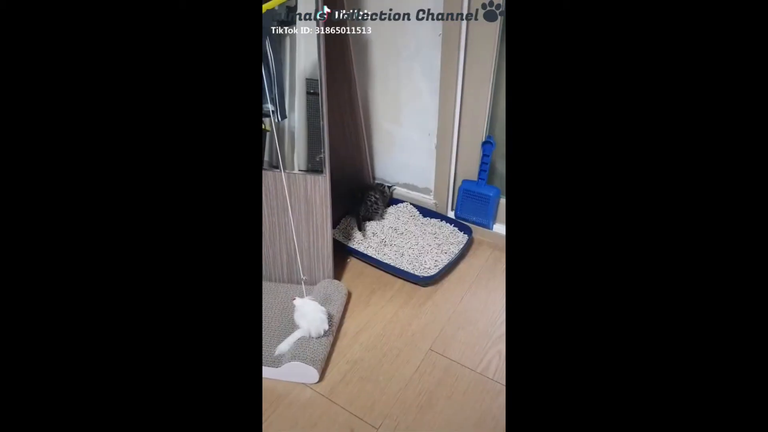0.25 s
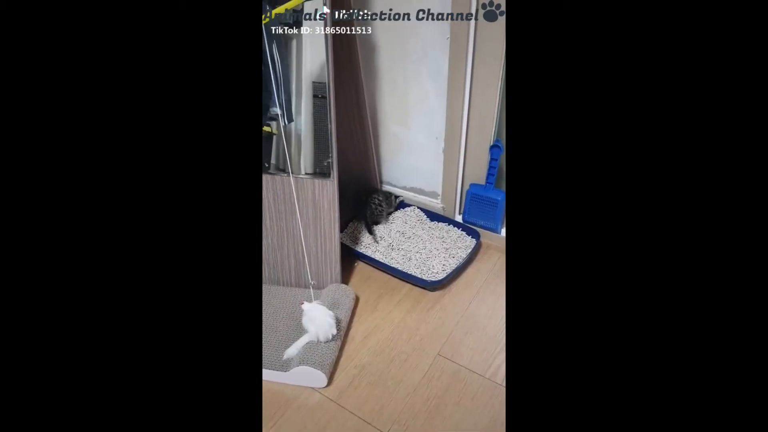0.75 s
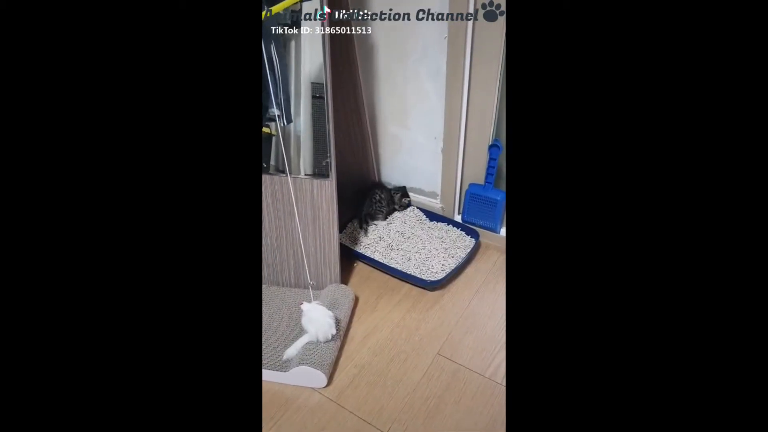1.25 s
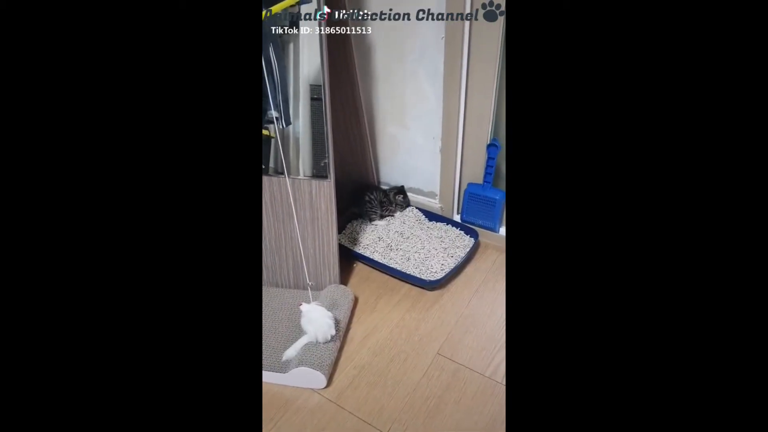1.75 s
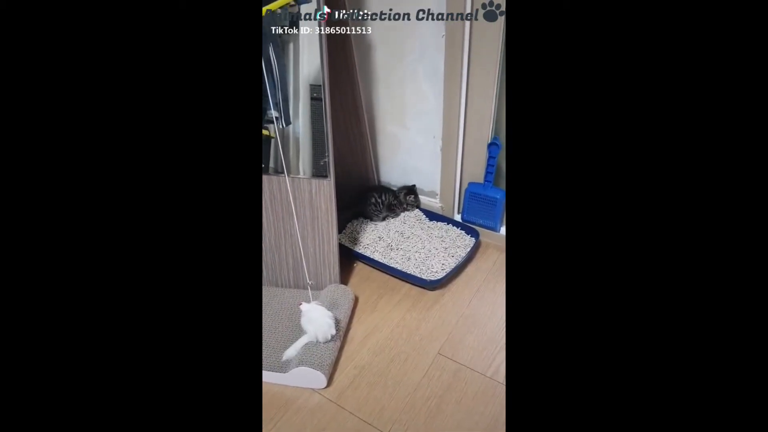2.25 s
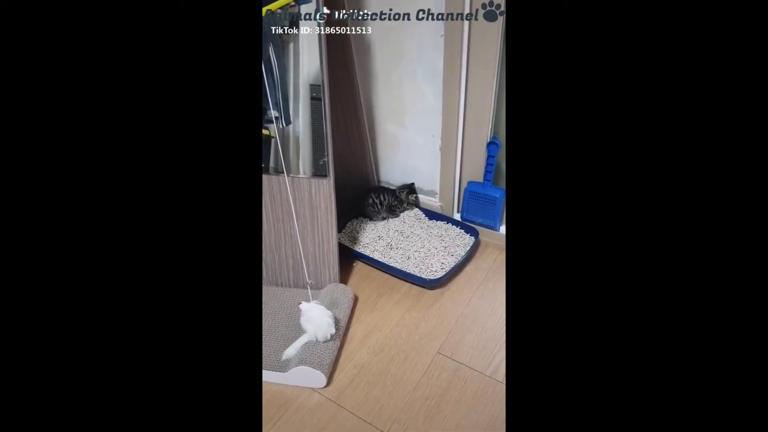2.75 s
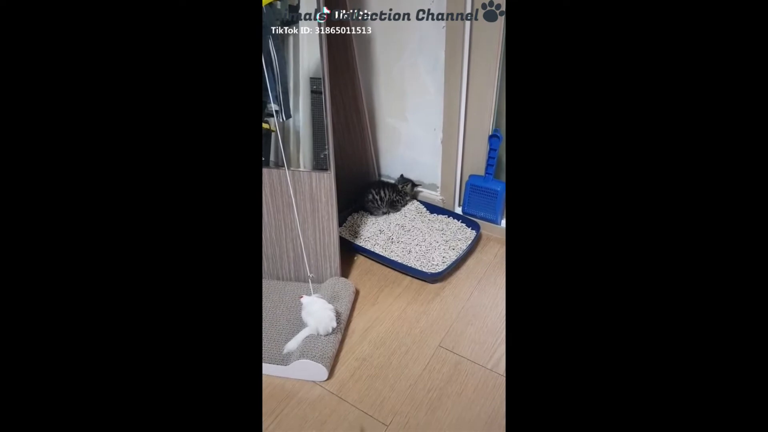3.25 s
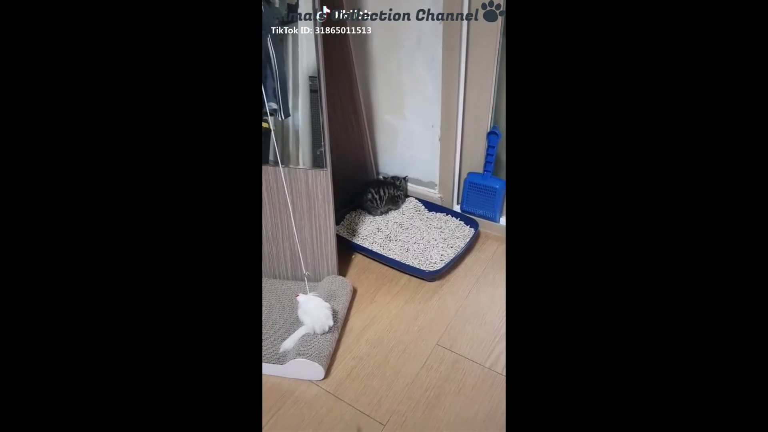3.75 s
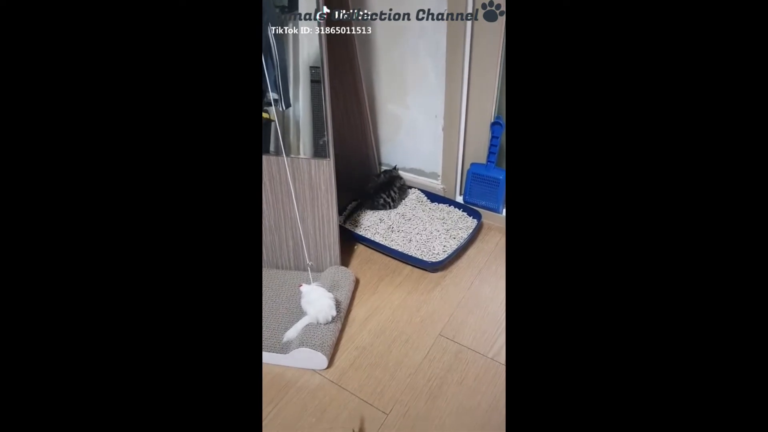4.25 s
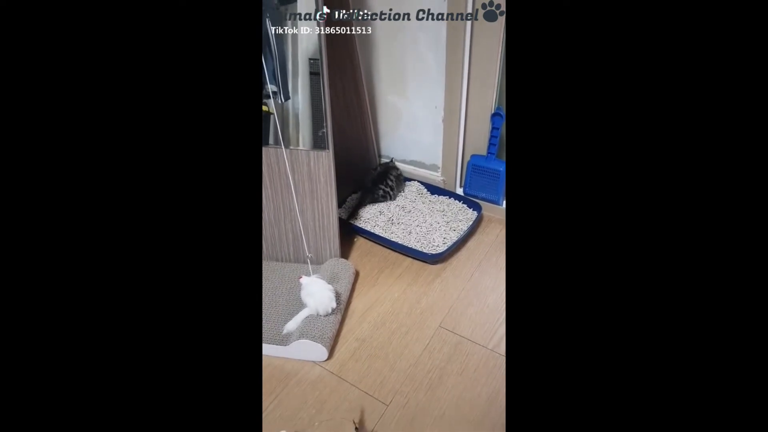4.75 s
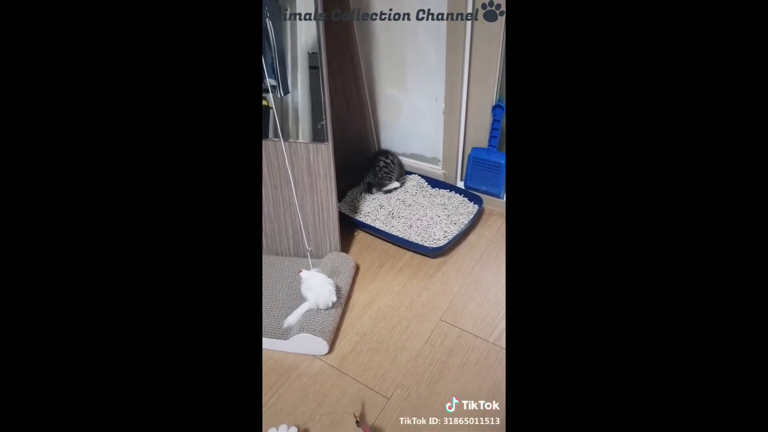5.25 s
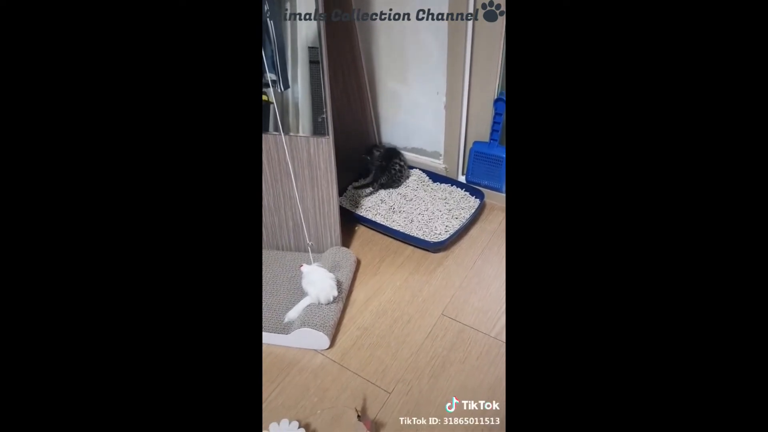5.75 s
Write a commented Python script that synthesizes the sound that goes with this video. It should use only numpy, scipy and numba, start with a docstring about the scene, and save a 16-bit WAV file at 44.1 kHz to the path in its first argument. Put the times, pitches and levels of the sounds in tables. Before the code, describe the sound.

Crunching, rattling strokes of small hard pellets, with claws tapping hollow plastic and flung pellets snapping and bouncing. Strokes come in clusters with calmer shuffling between them, and grow nearly continuous in the last two seconds. The sound is close, dry and slightly left in stereo, with a short room tail. A soft engine rumble from outside wavers underneath and drops in pitch near the end.

```python
"""Crunching, rattling paw strokes and bright snaps: a kitten paws through pellet litter in a plastic tray.
The tray stands in the corner of a small room, left of a phone with two microphone ports.
Each stroke swells a dense stream of damped sine knocks; flung pellets and claws add single hits and bounces.
Behind it an engine drones outdoors as two sines and slows down, over room noise, faint hum and a rustle."""
import sys
import numpy as np
from scipy import signal
from scipy.fft import rfft, irfft, next_fast_len
from scipy.io import wavfile
from scipy.ndimage import uniform_filter1d
from numba import njit

SR = 44100
rng = np.random.default_rng(int(sys.argv[2]) if len(sys.argv) > 2 else 0)


def wav_record(signal):
    """Record a signal, one row per channel, as 16-bit PCM in the file named by sys.argv[1]."""
    frames = np.transpose(np.atleast_2d(signal))
    bounded = np.clip(frames, -1, 1)
    # unit amplitude maps onto the largest positive 16-bit level
    quanta = np.round(bounded * 32767).astype(np.int16)
    wavfile.write(sys.argv[1], SR, quanta)


N = 265041


def undb(db):
    """Turns decibels into an amplitude factor."""
    return 10 ** (np.asarray(db) / 20)


def level(x, db):
    """Scales a signal to an rms level in dB."""
    return x * undb(db) / np.sqrt(np.mean(x ** 2))


def at_hz(table, hz):
    """Reads a spectrum on a log-frequency axis."""
    f, v = np.transpose(table)
    return np.interp(np.log(hz), np.log(f), v)


def walk(rate_hz):
    """Wanders smoothly at random: values held 1 / rate_hz s, averaged twice, with a spread near 1."""
    hold = int(SR / rate_hz)
    steps = np.repeat(rng.standard_normal(N // hold + 1), hold)
    return 1.38 * uniform_filter1d(uniform_filter1d(steps, hold), hold)[:N]


# Spectrum of the room noise, before it is set to its overall level: pitch_hz, relative level_db (per Hz)
AIR_SPECTRUM = [(15, 0), (25, -16.5), (58, -5.5), (118, -10), (135, -17), (185, -19), (205, -24.5),
                (274, -24.5), (386, -30), (418, -27.5), (766, -36.5), (1870, -37.5), (2710, -47),
                (12500, -42), (13500, -61)]
# How alike the room noise is at the two ports: pitch_hz, correlation (0 to 1)
PORT_LIKENESS = [(60, 0.9), (130, 0.78), (280, 0.69), (600, 0.00067), (1300, 0.0)]


def air(level_db=-54, swell_db=.4, flicker_db=2.5, left_db=1.35):
    """Half-octave bands of room noise swell together and flicker alone; the bass is alike at both ports."""
    n = 2 * next_fast_len(N // 2 + 1)
    hz = np.fft.rfftfreq(n, 1 / SR)[1:]
    like = np.clip(at_hz(PORT_LIKENESS, hz), 0, 1)
    colour = undb(at_hz(AIR_SPECTRUM, hz))
    # what the ports share, and what they hear with opposite sign
    mid, side = (rfft(rng.standard_normal(n))[1:] * colour * np.sqrt(1 + sign * like) for sign in (1, -1))
    ports = np.array([mid + side, mid - side])
    out, swell = 0, swell_db * walk(1.0)
    for step in range(19):
        share = np.clip(1 - abs(2 * np.log2(hz / 25) - step), 0, 1)
        spectrum = np.pad(ports * share, ((0, 0), (1, 0)))  # no constant offset
        band = irfft(spectrum, n)[:, :N]
        out = out + band * undb(swell + flicker_db * walk(22))
    return level(out, level_db) * undb([[left_db / 2], [-left_db / 2]])


# Steady appliance tones in the room: pitch_hz, level_db (rms)
HUM_TONES = [(299, -79.5), (420, -85)]


def hum():
    """Appliances hold steady sines, equal at both ports."""
    t = np.arange(N) / SR
    return sum(np.sqrt(2) * undb(db) * np.sin(2 * np.pi * hz * t) for hz, db in HUM_TONES)


# How strongly the engine reaches the room: time_s, level_db (lower tone, rms), second_multiple_db (rms);
# both waver and lean left
ENGINE_LEVELS = [(0.0, -68, -63), (0.8, -53.5, -60), (1.5, -59, -70), (2.25, -58, -56), (2.9, -58, -79),
                 (3.35, -56.5, -58.5), (3.55, -58, -76), (3.849, -66, -53.5), (3.999, -47.5, -56),
                 (4.45, -49.5, -58.5), (5.03, -47, -63.5), (5.13, -56, -58.5), (5.29, -47, -55),
                 (5.55, -58.5, -75), (5.75, -64, -63), (5.85, -65, -50), (6.01, -48, -56)]
# the lower tone runs steadily, then glides down to a tick-over
RUNNING_HZ, SLOWS_AT_S, TICKOVER_HZ, SLOWING_S = 54.7, 5.08, 36.9, 0.26


def engine(waver_hz=0.73, waver_db=0.5, left_db=3.0, second_left_db=2.0):
    """Two multiples of the firing rate come through the walls, slightly unsteady."""
    t = np.arange(N) / SR
    at, *columns = np.transpose(ENGINE_LEVELS)
    low_db, second_db = (np.interp(t, at, c) for c in columns)
    slowing = np.exp(-np.maximum(t - SLOWS_AT_S, 0) / SLOWING_S)
    hz = TICKOVER_HZ + (RUNNING_HZ - TICKOVER_HZ) * slowing
    phase = 2 * np.pi * np.cumsum(hz + waver_hz * walk(12)) / SR
    ports = np.array([[.5], [-.5]])
    low = undb(low_db + waver_db * walk(22) + left_db * ports) * np.sin(phase)
    second = undb(second_db + waver_db * walk(8.2) + second_left_db * ports) * np.sin(2 * phase)
    return np.sqrt(2) * (low + second)


# A faint middle-range rustle, strongest about four seconds in: time_s, level_db (rms before its flicker)
RUSTLE_LEVELS = [(0, -80), (3.4, -74.5), (3.72, -67), (3.85, -62), (3.97, -59), (4.4, -68), (5.3, -69),
                 (5.6, -76), (6.01, -70)]


def rustle(hz=1350, width_hz=450, flicker_db=3.5):
    """Noise through one broad resonance applied twice, unsteady and unlike at the two ports."""
    peak = signal.iirpeak(hz, hz / width_hz, fs=SR)
    noise = rng.standard_normal((2, N))
    band = signal.lfilter(*peak, signal.lfilter(*peak, noise))
    swell_db = np.interp(np.arange(N) / SR, *np.transpose(RUSTLE_LEVELS))
    return level(band, 0) * undb(swell_db + flicker_db * walk(29.9))


@njit
def ring(n, start, turn, fade, size, rise):
    """Adds one damped sine for each knock; the contact takes a moment to build up."""
    out = np.zeros(n)
    for k in range(len(start)):
        z, per_sample = size[k] + 0j, np.exp(1j * turn[k] - fade[k])
        soft, soft_step = 1., np.exp(-turn[k] / rise)
        for i in range(start[k], min(n, start[k] + int(6 / fade[k]))):
            out[i] += z.imag * (1 - soft)
            z, soft = z * per_sample, soft * soft_step
    return out


# How much louder the port facing the tray hears a knock: pitch_hz, left_minus_right_db (before random panning)
LEFT_EXCESS = [(300, 2), (600, 4.5), (1200, 4), (2400, 4), (4500, 9.5), (7200, 11), (13000, -3)]
SPOTS = 5  # places in the tray, each with its own echoes
LEFT_LEAD_S = 0.00014  # average head start of the left port
CONTACT_RAD = 3.1  # build-up of a knock, in radians of its own pitch


def knocks(s, hz, cycles, size, lead_spread_s=.0001, pan_db=2.0):
    """Knocks from random tray spots; the left port faces them, mostly hears first and gets more treble."""
    hz = np.clip(hz, 100, .4 * SR)
    turn, fade = 2 * np.pi * hz / SR, hz / SR / cycles
    spot = rng.random(len(s))
    early, aside = rng.standard_normal((2, len(s)))
    side = undb((at_hz(LEFT_EXCESS, hz) + pan_db * aside) / 2)
    left = (s * SR).astype(int)
    lead = ((LEFT_LEAD_S + lead_spread_s * early) * SR).astype(int)
    right = np.maximum(left + lead, 0)
    ports = ((left, size * side), (right, size / side))
    out = []
    for k in range(SPOTS):
        m = (spot * SPOTS).astype(int) == k
        out.append([ring(N, at[m], turn[m], fade[m], gain[m], CONTACT_RAD) for at, gain in ports])
    return np.array(out)


def room(dry, wet_db, t60_s=0.083):
    """The corner and the walls return a short diffuse tail, different for each spot and port."""
    t = np.arange(int(.3 * SR)) / SR
    tail = rng.standard_normal((SPOTS, 2, len(t))) * undb(-60 * t / t60_s) * (t > .002)
    tail = tail / np.sqrt(np.sum(tail ** 2, axis=2, keepdims=True))
    wet = signal.fftconvolve(dry, tail, axes=2)[:, :, :N]
    return np.sum(dry + undb(wet_db) * wet, axis=0)


# Resonances of the plastic tray: pitch_hz, width_hz, level_db (against the sound that drives them)
TRAY_MODES = [(817, 87, -17.5), (997, 40, -2), (1340, 40, -8), (2060, 50, -15.5), (2500, 83, -15.5),
              (3920, 270, -15), (5500, 83, -10.5), (6700, 140, -6)]


def tray_ring(x):
    """The tray rings on at its own pitches under the litter that moves in it."""
    out = x
    for hz, width_hz, db in TRAY_MODES:
        out = out + undb(db) * signal.lfilter(*signal.iirpeak(hz, hz / width_hz, fs=SR), x)
    return out


# Paws landing on the tray: start_s, level_db (nominal size of the knock)
PAW_LANDINGS = [(2.174, -43.5), (3.986, -41)]


def thumps(hz=270, cycles=0.98):
    """Dull blows that flex the tray floor."""
    s, db = np.transpose(PAW_LANDINGS)
    return knocks(s, hz * np.ones(len(s)), cycles, undb(db))


# Claws and clumps knocking the tray floor: start_s, level_db (nominal size of the knock), pitch_hz
CLAW_KNOCKS = [(0.056, -32, 1510), (0.067, -30, 1450), (0.146, -34.5, 740), (0.187, -40, 1330),
               (0.673, -35.5, 1340), (0.692, -43, 1120), (0.728, -39, 900), (0.737, -38, 870),
               (1.153, -43, 830), (1.393, -43, 1020), (1.42, -52, 990), (1.51, -37, 1600),
               (2.404, -39.5, 883), (2.458, -38, 950), (2.58, -45, 775), (2.602, -30.5, 860),
               (2.629, -29.5, 990), (3.475, -49, 956), (3.987, -33, 800), (4.125, -31, 1340),
               (4.157, -32, 1360), (4.519, -42, 781), (4.533, -41, 770), (4.858, -44, 1440),
               (4.87, -38, 1440), (5.06, -33, 1310), (5.105, -39, 1340), (5.432, -47, 675),
               (5.617, -44, 1090), (5.704, -36.5, 980), (5.811, -44, 790), (5.849, -36, 848),
               (5.898, -38, 710)]


def claws(cycles=1.92):
    """Short hollow knocks on the plastic."""
    s, db, hz = np.transpose(CLAW_KNOCKS)
    return knocks(s, hz, cycles, undb(db), lead_spread_s=0, pan_db=0)


# Pellets flung at the tray: start_s, level_db (nominal size of the hit), pitch_hz,
# bounce_db (bounces against the hit, before fading and a random 0 to 4 dB lift)
FLUNG_PELLETS = [(0.0570, -34, 1740, -15), (0.0688, -27.5, 3680, -12), (0.0728, -31, 3930, -16),
                 (0.0783, -33, 3700, -16), (0.0883, -38, 3950, -18), (0.0940, -31, 4200, -20),
                 (0.1062, -29.5, 3580, -18), (0.1975, -32, 3960, -10), (0.1475, -37, 1990, -10.5),
                 (0.2404, -37, 3500, -18), (0.2772, -40, 4300, -14), (0.2893, -40, 5400, -14),
                 (0.4549, -46, 3770, -12), (0.4668, -26.5, 4700, -13), (0.4712, -32, 5500, -9),
                 (0.6740, -31.5, 5900, -18), (0.6872, -32.5, 5520, -12), (0.8939, -51.5, 4840, -4),
                 (1.1440, -41, 4600, -12), (1.1545, -49, 1440, -11), (1.2425, -56, 2640, -10),
                 (1.3557, -52, 1700, 2), (1.4583, -45, 3920, -18), (1.494, -40, 5600, -3),
                 (1.5097, -33.5, 4350, -7), (1.5169, -34, 2580, -8), (1.5225, -34, 3000, -8),
                 (1.529, -35, 4500, -8), (2.0992, -54, 2840, -7), (2.4055, -31, 4400, -9),
                 (2.4372, -31.5, 5400, -10), (2.4590, -29.5, 4980, -6), (2.6030, -29, 2600, -13),
                 (2.6222, -30, 4300, -8), (2.6363, -24.5, 3450, -18), (2.6438, -30, 3300, -15),
                 (2.6495, -39, 2960, -4), (2.6933, -36.5, 5040, -10), (2.7184, -48, 4210, -11),
                 (2.7243, -43, 4740, -20), (2.7544, -48, 3640, -20), (2.7830, -47, 4700, -7),
                 (2.8212, -54, 3800, -11), (2.8680, -47, 4650, -8), (2.8755, -50, 4500, -16),
                 (3.5082, -50, 1570, -12), (3.9795, -28, 7350, -9), (3.988, -31.5, 4800, -8),
                 (4.0384, -32.5, 3560, -14), (4.0412, -33, 3800, -16), (4.1256, -33, 2200, -14),
                 (4.1563, -30, 3930, -12), (4.1592, -29, 4200, -14), (4.1625, -31, 3000, -12),
                 (4.167, -33, 4000, -12), (4.2153, -41.5, 2410, -10), (4.5136, -43, 2460, -10),
                 (4.5327, -34.5, 3480, -16), (4.8558, -41, 2240, -5), (4.8384, -43, 2580, -10),
                 (4.8869, -29, 2630, -12), (4.8940, -31, 3600, -20), (4.9222, -44, 3500, -21),
                 (5.0761, -39, 2700, -14), (5.0942, -36.5, 1920, -16), (5.1070, -38, 2530, -10),
                 (5.1332, -34, 2710, -10), (5.2350, -40, 2610, -6.5), (5.2846, -42, 4700, -5),
                 (5.7047, -38, 2150, -13), (5.7167, -42, 2200, -13), (5.7958, -44, 3440, -7),
                 (5.8042, -29, 4750, -12), (5.8238, -32, 4230, -21), (5.8490, -38, 2520, -5),
                 (5.8787, -37, 4540, -1), (5.9000, -44, 3000, -12)]
# What one hit rings with: share of its pitch (ratio), level_db (added to that of the hit)
HIT_PARTIALS = [(.22, -18), (.72, 1), (1, 7), (1.3, -3.5), (1.9, -21)]
BOUNCE_WAIT_S, BOUNCES_LAST_S, BOUNCE_T60_S = .002, 0.027, 0.1  # first flight, shower, fading


def snaps(count=14, hit_cycles=2.3, cycles=4.0, spread=.22):
    """A hit that cracks broadly, then a shower of weaker bounces of nearby pitch."""
    s, db, hz, bounce_db = (c[:, None] for c in np.transpose(FLUNG_PELLETS))
    share, share_db = np.transpose(HIT_PARTIALS)
    hit_s, hit_hz = (s + 0 * share).ravel(), (hz * share).ravel()
    hit = knocks(hit_s, hit_hz, hit_cycles, undb(db + share_db).ravel(), lead_spread_s=0, pan_db=0)
    later = BOUNCE_WAIT_S + rng.random((len(s), count)) * BOUNCES_LAST_S
    pitch = hz * np.exp(spread * rng.standard_normal(later.shape))
    size = undb(db - 60 * later / BOUNCE_T60_S + bounce_db + 4 * rng.random(later.shape))
    return hit + knocks((s + later).ravel(), pitch.ravel(), cycles, size.ravel(), pan_db=1.5)


# Paw strokes: fullest_s, level_db (heap being pushed), build_s, settle_s, then against the heap:
# rolling_db (pellets rolling in it), loose_db (pellets on top), grit_db
PAW_STROKES = [(0.064, -45, 0.032, 0.5, 5.5, -1, -6.5), (0.21, -48.5, 0.13, 0.13, 2.5, 1, -4),
               (0.295, -64.5, 0.058, 0.04, -7.5, -11, 14.5), (0.473, -56.5, 0.044, 0.14, 5, 5.5, 8.5),
               (0.545, -60, 0.031, .08, 5, -4, -19), (0.65, -62, 0.095, 0.12, 9, 1.5, -12),
               (0.689, -54.5, 0.047, 0.065, 6, -4, 12.5), (0.73, -50.5, 0.12, 0.19, 1, -4.5, -11.5),
               (0.9, -74, 0.11, 0.15, -20, -3, -6), (1.149, -60, 0.057, 0.42, 0, -5, -10),
               (1.19, -59, 0.12, 0.07, 11, -12, -16), (1.27, -54, 0.97, 0.37, 3, -5.5, -12.5),
               (1.385, -59.5, 0.07, .15, 16, 1.5, 0), (1.45, -50.5, 0.23, 0.27, 4, -4.5, -7),
               (1.512, -42.5, 0.033, 0.078, -7, -5, -4), (1.529, -46, 0.12, 0.07, 1.5, -10, -2),
               (1.92, -57.5, 0.15, 0.14, 0.5, -6, -16), (2.1, -68.5, 0.12, 0.22, 6.5, 0.5, -3),
               (2.345, -57, 0.023, 0.093, -8, -3, -28), (2.411, -54, 0.019, 0.14, 10, 9, 7),
               (2.46, -53, 0.13, 0.072, 6, 3.5, -22), (2.592, -56.5, 0.038, .05, 1, 3, -9),
               (2.606, -42.5, 0.022, 0.14, 3, -3.5, -3), (2.629, -49, 0.077, 0.12, 10, 0, 4.5),
               (2.7, -59.5, 0.34, 0.23, -6, 5.5, 5.5), (2.78, -63.5, 0.27, 0.18, 9.5, 7.5, 6),
               (2.875, -69.5, 0.083, 0.11, 8, 7.5, 7), (3.22, -67.5, 0.1, 0.16, 4.5, -1, -18),
               (3.49, -55.5, 0.18, 0.36, 0, -7.5, -17), (3.7, -74, 0.28, 0.2, -18, -23, -5),
               (3.87, -58.5, 0.18, 0.2, -4, -10, -12.5), (3.983, -42, 0.019, 0.068, -1.5, -13, 3),
               (4.035, -50.5, .06, 0.22, 6, -3.5, -8), (4.104, -45, 0.17, 0.16, 5, -6, -5.5),
               (4.16, -45.5, 0.13, 0.092, 7, 0, -5), (4.22, -55, 0.065, 0.084, 7, -3, -11),
               (4.33, -64, 0.12, 0.46, -3, -31, -9), (4.539, -49.5, 0.041, 0.079, 3.5, 2.5, -4),
               (4.7, -51, 0.19, 0.17, 1.5, -16.5, -13.5), (4.855, -54, 0.055, 0.079, 14, 1, 0),
               (4.889, -45, 0.1, 0.12, 8, 1, -8.5), (4.95, -50, 0.19, 0.29, 0.5, -10, -16),
               (5.02, -51, 0.47, 0.34, 1.5, -14, -29), (5.07, -47.5, 0.059, 0.11, 3, 2, -10),
               (5.104, -47.5, 0.091, 0.13, 11.5, 1, -15), (5.145, -53, 0.058, 0.15, 12, -8, -11),
               (5.238, -66, 0.065, 0.076, 17, 10.5, 11), (5.288, -65.5, 0.023, 0.098, 8, 7.5, 6),
               (5.379, -49.5, 0.1, 0.12, 3, -13.5, -19), (5.45, -50.5, 0.17, 0.15, 3.5, -17, -23),
               (5.63, -54.5, 0.1, 0.31, -7, -18.5, -19), (5.71, -54.5, 0.059, 0.1, 8.5, -16, -19),
               (5.81, -50.5, 0.045, 0.15, 9.5, 2, 2), (5.89, -48, 0.17, 0.15, 1.5, -5, -4),
               (5.945, -63, 0.13, 0.25, 13, -10, -15)]
# The heap creeping under the kitten's weight: time_s, level_db
HEAP_CREEP = [(0, -60), (1.0, -67), (1.7, -64.5), (3.1, -63), (3.7, -62.5), (4.4, -59.5), (5.3, -57),
              (5.57, -64), (6.01, -55.5)]
CREEP_LAYERS_DB = [0, -13, -18.5, -25]  # heap, rolling, loose, grit, against the heap
STROKE_RANGE_DB = 30  # fall below the fullest, reached build_s before and settle_s after


def effort(s):
    """Each stroke builds up and settles over the creeping heap: level in dB of each of the four layers."""
    at, db, build, settle, *layers_db = (c[:, None] for c in np.transpose(PAW_STROKES))
    before, after = (at - s) / np.maximum(build, .005), (s - at) / np.maximum(settle, .005)
    shape_db = db - STROKE_RANGE_DB * np.where(s < at, before, after)
    layer_gain = undb(np.hstack([0 * db, *layers_db]))
    strokes = layer_gain.T ** 2 @ undb(shape_db) ** 2
    creep = undb(np.interp(s, *np.transpose(HEAP_CREEP)) + np.array(CREEP_LAYERS_DB)[:, None])
    return 10 * np.log10(strokes + creep ** 2)


# Colour of the pellet knocks, before each layer is set to its level: pitch_hz, relative level_db (per Hz)
PELLET_SPECTRUM = [(290, -50), (500, -14), (736, -3.5), (1080, -8.5), (1330, -1), (1610, -4.5),
                   (2040, -3.5), (3800, 11), (6000, 0), (7800, -10.5), (9300, -12.5), (11800, -11),
                   (13500, -96)]
# How unevenly pellets knock, the heap smoother than loose grit: pitch_hz, scatter_db
KNOCK_SCATTER = [(800, 2.6), (4000, 4.4)]
# Where heap, rolling pellets, loose pellets and grit each take over: pitch_hz
LAYER_PITCHES = [930, 2232, 3560, 7100]
# Uneven sliding of the same four layers, the lighter the jerkier: slip_db
LAYER_SLIPS = [.8, 1.2, 2, 2.5]
KNOCKS_PER_S, SLIPS_PER_S = 4500, 60
LOUDEST_KNOCK = 2.6  # in units of the scatter


def litter(cycles=2.7):
    """Dense knocks of pellet on pellet, each with its own pitch; every layer slips in its own bursts."""
    count = KNOCKS_PER_S * N // SR
    when, pitch = rng.random((count, 2)).T
    s = when * N / SR
    lowest, highest = PELLET_SPECTRUM[0][0], PELLET_SPECTRUM[-1][0]
    hz = lowest * (highest / lowest) ** pitch
    uneven = np.minimum(rng.exponential(size=count), LOUDEST_KNOCK)
    # high knocks are shorter and spread wider, so they start larger
    size = hz * undb(at_hz(PELLET_SPECTRUM, hz) + at_hz(KNOCK_SCATTER, hz) * uneven)
    energy = size ** 2 * cycles * SR / hz / 4 / N
    # each pitch is shared between the two nearest layers
    share = np.array([at_hz(list(zip(LAYER_PITCHES, row)), hz) for row in np.eye(len(LAYER_PITCHES))])
    size = size / np.sqrt((share @ energy) @ share)
    slip_db = np.array([db * walk(SLIPS_PER_S)[(s * SR).astype(int)] for db in LAYER_SLIPS])
    layers_db = np.sum(share * (effort(s) + slip_db), axis=0)
    return knocks(s, hz, cycles, size * undb(layers_db))


def scene():
    """Tray sounds in the room, over engine, air, hum and rustle."""
    heap = tray_ring(room(litter(), wet_db=-.5))
    # flung pellets and claws land in the open and sound drier than the heap in the corner
    hits = room(snaps() + claws(), wet_db=-7.0)
    # the tray sounds carry no bass below about 570 Hz
    no_bass = signal.butter(6, 574, "high", fs=SR, output="sos")
    tray = signal.sosfilt(no_bass, heap + hits)
    paws = np.sum(thumps(), axis=0)
    return tray + paws + engine() + air() + hum() + rustle()


def record(dry):
    """The phone cuts the top steeply above 13.5 kHz."""
    return signal.sosfilt(signal.ellip(10, .2, 80, 13500, fs=SR, output="sos"), dry)


dry = scene()
out = record(dry)
wav_record(out)
```